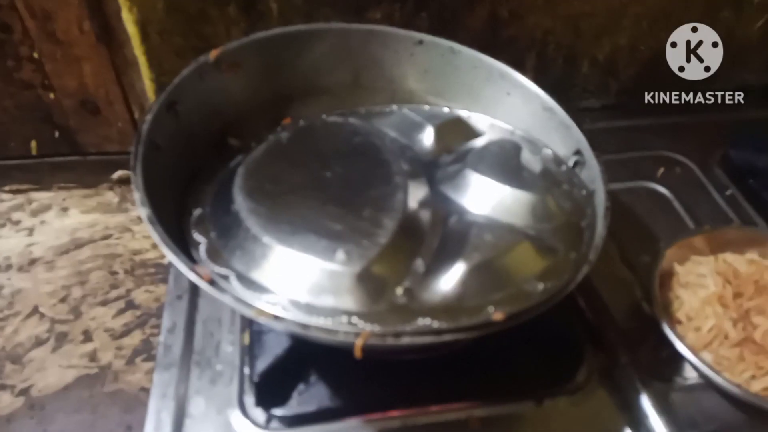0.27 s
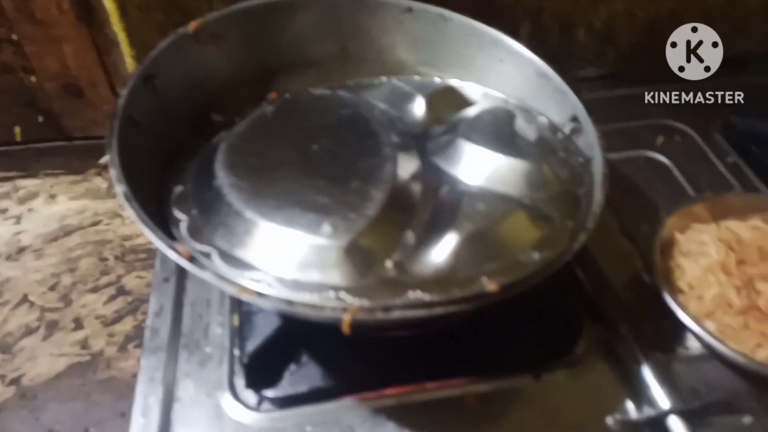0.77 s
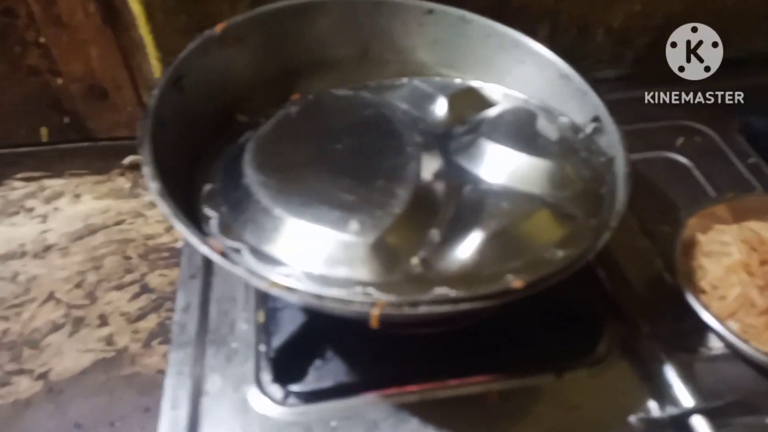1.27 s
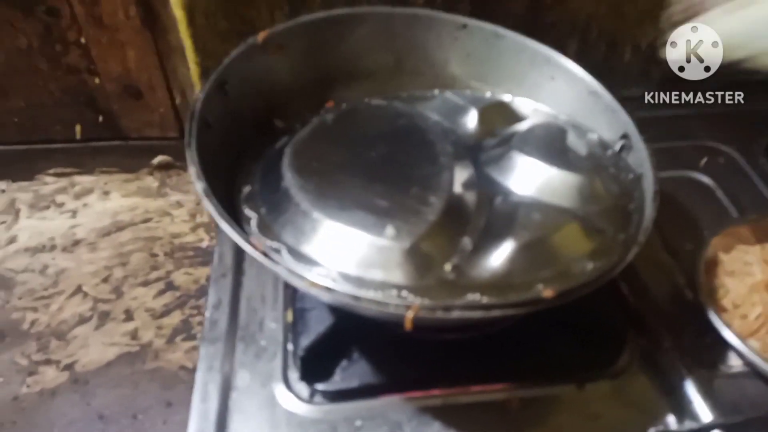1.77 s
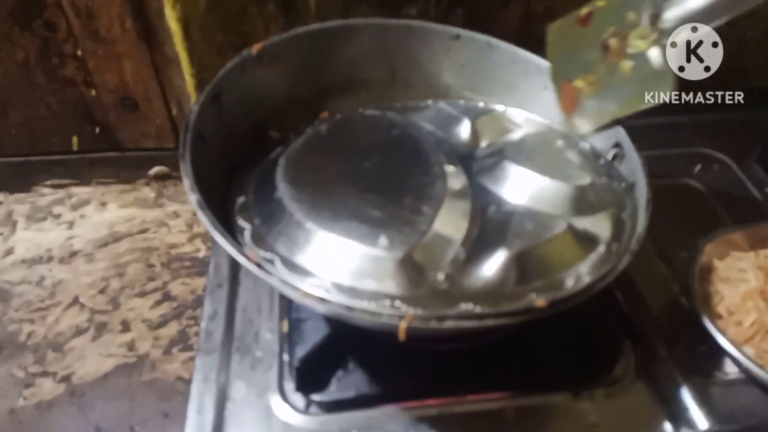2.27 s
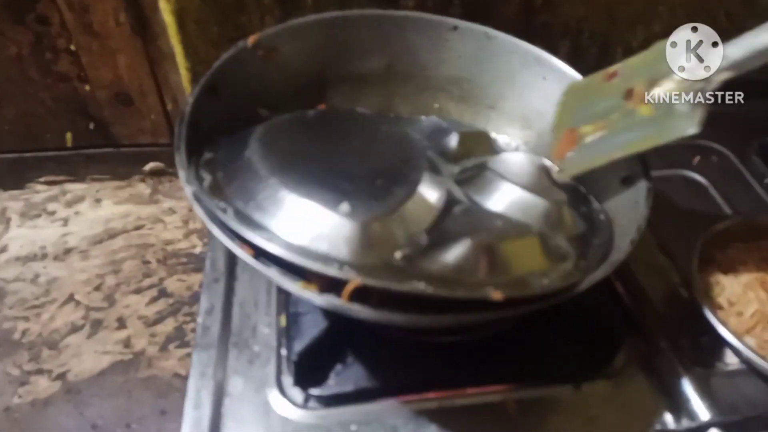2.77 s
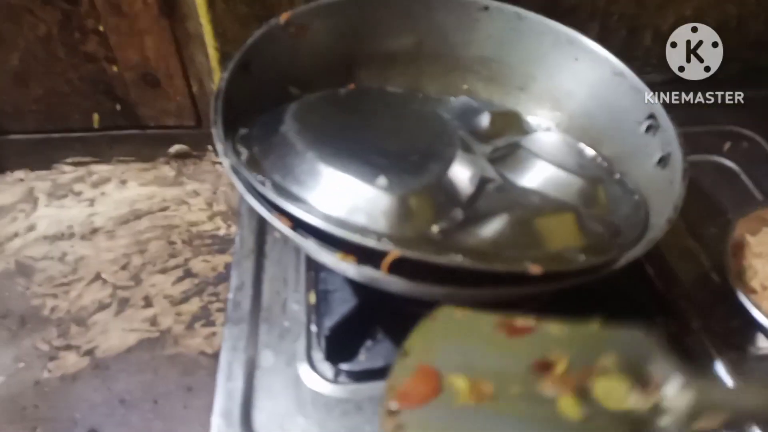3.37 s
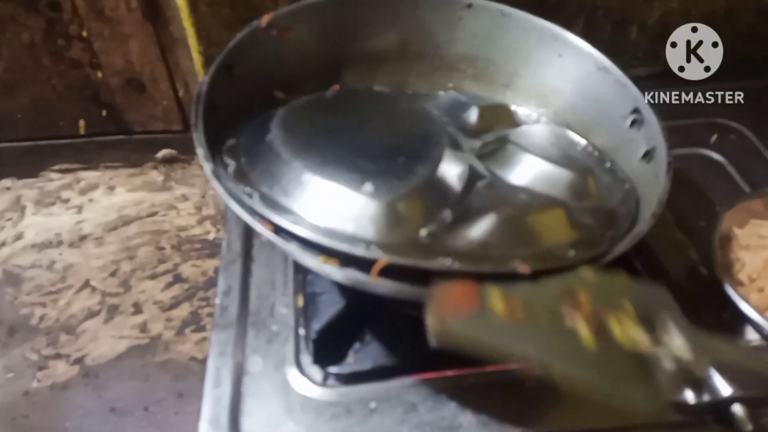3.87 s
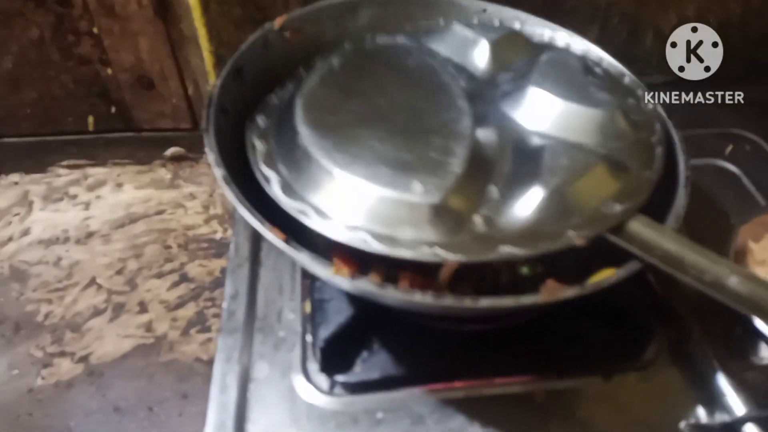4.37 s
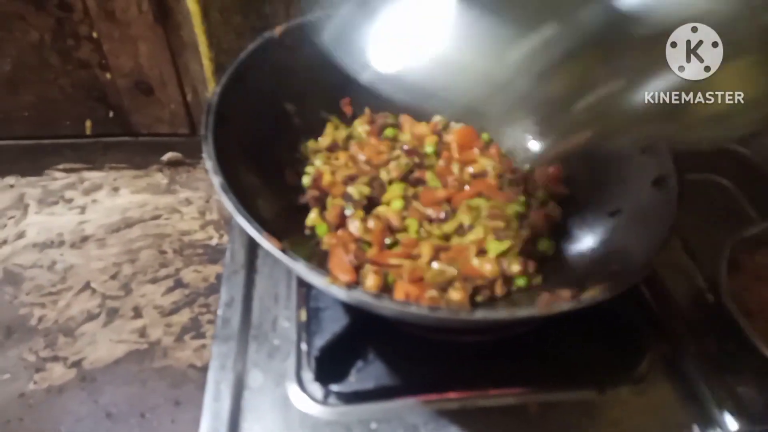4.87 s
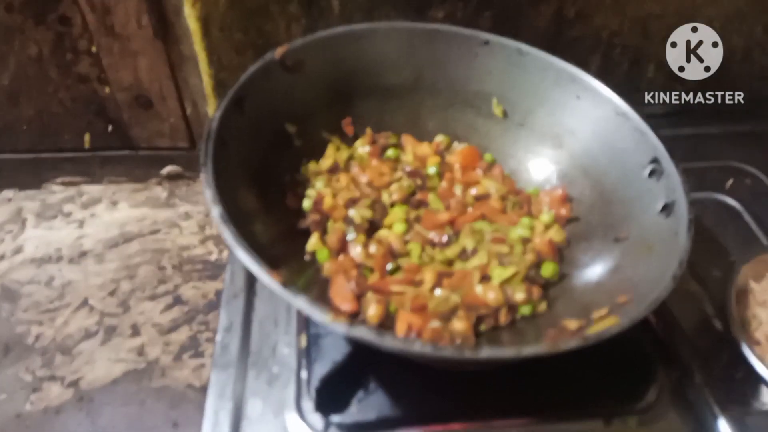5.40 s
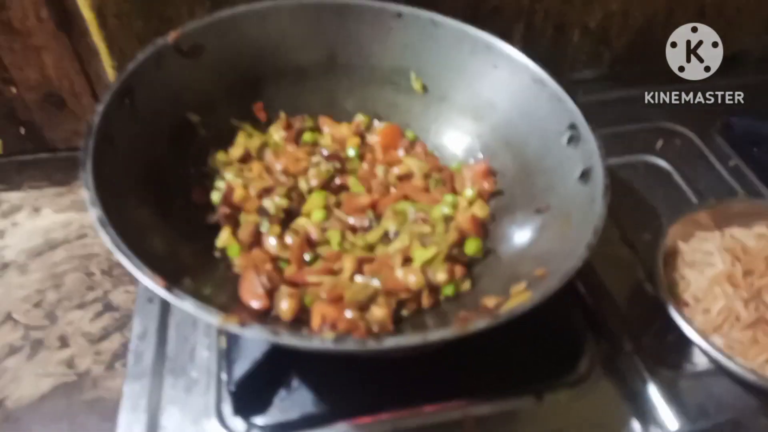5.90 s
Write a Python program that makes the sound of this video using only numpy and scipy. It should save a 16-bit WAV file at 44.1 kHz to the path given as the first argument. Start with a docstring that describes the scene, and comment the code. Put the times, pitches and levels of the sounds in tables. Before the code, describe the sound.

Vegetables sizzle under a steel plate that a spatula scrapes and lifts off; the sizzle opens up and the plate clatters down.

```python
"""Lifting the plate off a sizzling wok

At the stove in a kitchen, a hand-held phone close to the wok. Vegetables fry under an upturned steel
plate, which muffles the bubbles bursting in the oil. A spatula prises the plate ajar, knocks on the
stove, then slides under and lifts it off. The sizzle opens up and the plate clatters down on the counter.
Right at the microphone, fingers rub on the phone case and one draught passes."""
import sys
import numpy as np
from scipy import signal
from scipy.fft import rfft, irfft, next_fast_len
from scipy.io import wavfile
from scipy.ndimage import uniform_filter1d

SR = 44100
rng = np.random.default_rng(int(sys.argv[2]) if len(sys.argv) > 2 else 0)


def digitize_waveform(pressure):
    """Quantize a signal to 16-bit integers and store it at the path in sys.argv[1].

    Rows of a 2-D input are taken as channels; values are limited to [-1, 1].
    """
    field = np.atleast_2d(pressure).T
    bounded = np.clip(field, -1, 1)
    quanta = np.round(bounded * 32767).astype(np.int16)
    wavfile.write(sys.argv[1], SR, quanta)


N = 270838
T = np.arange(N) / SR

# The sizzle as heard at the phone; it fades during the final clatter.
# Each row: time in seconds, level at the phone in dB, how far the plate is off from 0 to 1.
SIZZLE = [(0, 2, 0.1), (1.1, 0.5, 0.08), (2.17, -0.5, 0.07), (2.21, 2, 0.13), (2.8, 1.5, 0.32),
          (3.4, 0.5, 0.5), (4.3, 2, 0.63), (4.8, 4, 0.9), (5.55, 8, 0.85), (6.14, -14, 0.7)]
# Spectra of the oil: bubbles with the plate on and off, a spit, and water flashing to steam.
# Each row: frequency in Hz, level in dB. Levels in all tables are relative.
COVERED_COLOUR = [(25, -24), (80, -4.5), (150, -11.5), (400, -3), (800, -7.5), (1100, -15.5), (1500, 2.5),
                  (2150, -5), (3200, -2), (3800, -10), (5200, -8), (6800, 1.5), (8000, -3.5), (10500, -8.5),
                  (13700, -14)]
UNCOVERED_COLOUR = [(40, -40), (150, -21), (400, -21), (700, -17.5), (1100, -17), (2000, -18), (3500, -11),
                    (5300, -13.5), (6300, -1.5), (7200, -0.5), (7900, -6.5), (9600, -7), (11500, -12),
                    (13700, -15.5)]
SPIT_COLOUR = [(40, -60), (200, -14), (1000, -14), (2800, 14.5), (5000, -4), (7200, 12), (10000, 8),
               (14000, -9)]
FLASH_COLOUR = [(40, -40), (200, -6), (1100, -11), (1500, 6), (4500, 5), (5200, -1), (7200, 7.5),
                (9000, -6), (14000, -14.5)]
# Air and metal under the plate. Each row: frequency in Hz, nominal width in Hz, level in dB.
SHUT_HOLLOW = [(1773, 175, 14.5), (2540, 400, 6)]
AJAR_HOLLOW = [(1933, 40, 7.8), (2405, 420, 13), (2540, 140, 3.3), (3040, 160, 13), (4285, 370, 14),
               (5150, 430, 8.6), (5140, 1700, 2.8)]
# A short click at the very start, then sharp spits of oil.
# Each row: start in seconds, peak in dB, brightness in dB per octave.
CLICK_AND_SPITS = [(0.019, -18, 0), (0.383, -24, -8), (0.876, -16.5, -6.5), (0.897, -18, -5),
                   (0.942, -27, 7), (1.078, -27, 10), (1.187, -25, 8), (1.799, -22.5, 4), (3.155, -24, 8),
                   (4.577, -19, 5), (4.662, -24, -6), (4.914, -21, 10.5), (4.969, -16, 9),
                   (4.975, -23, -10.5), (5.008, -26.5, 6), (5.219, -21, -3.5), (5.269, -17, 14),
                   (5.344, -26, 8)]
# Steam fizzes out under the rim; the blade sticks and slips fast enough to make the plate sing.
# Each row: start in seconds, length in seconds, pitch in Hz, level in dB.
STEAM_SQUEAKS = [(1.108, 0.04, 8970, -39.5), (1.122, 0.06, 14400, -52)]
SCREECHES = [(2.3, .1, 6500, -34), (2.335, 0.064, 7480, -36), (2.618, 0.026, 7480, -36),
             (3.03, 0.12, 4280, -45), (3.22, 0.07, 4300, -44.5), (4.16, .095, 3540, -21.5),
             (4.185, 0.071, 4420, -26), (4.24, 0.085, 6620, -32), (4.47, 0.22, 1590, -46.5)]

# Modes of the plate as a lid on the wok, of the stove top, and of the plate laid on the counter.
# Each row: frequency in Hz, level in dB.
LID_MODES = [(207, -5), (366, -21), (508, 2), (619, 7), (707, 1), (820, -27), (899, 7.5), (1020, -11),
             (1122, -4), (1560, -13), (1873, 10), (2000, -15), (2519, -1), (3103, 13.5), (3208, 14),
             (3386, -4), (3442, 17), (3507, 12.5), (4223, -8), (4462, 5), (4906, 2), (5472, 9.5), (5835, 2),
             (6608, 3), (7400, 18)]
STOVE_MODES = [(204, -1), (293, -4), (465, -2), (608, 0.5), (909, -6), (1195, -8), (1254, -5), (1851, -5),
               (2600, 3.5), (2966, 6), (3380, 9), (4430, -1.5), (6608, -4), (6863, 2)]
LAID_MODES = [(207, -2.5), (266, 5), (366, 6.5), (621, 3), (680, -1), (759, -8), (826, -2), (915, -2),
              (1173, 5), (1246, -9), (2064, 7), (2433, 4.5), (2724, -4.5), (2890, -2), (2974, 0.5),
              (3173, 6.5), (3235, -2), (3345, -11), (3692, -8), (4056, 9), (4357, 10), (4511, 2),
              (5813, -15), (6236, -4), (7200, -16)]
# Spectra of the crowd of weaker modes between those. Each row: frequency in Hz, level in dB.
LID_BED = [(60, -17.5), (130, -7), (250, 3), (700, 4), (1100, -1), (1450, -15), (2300, -8), (3300, -1.5),
           (4300, -3.5), (5100, -9.5), (6000, -1), (7500, -13.5), (9000, -12), (14000, -18.5)]
STOVE_BED = [(60, -11), (200, 3), (600, 6), (1300, 4), (2200, -2), (3100, -2), (5200, -10), (6800, -12),
             (8500, -15), (14000, -29)]
LAID_BED = [(50, -19), (130, 5), (240, 5.5), (450, 3.5), (900, -3.5), (1500, -6.5), (2500, -1.5),
            (4000, 0.5), (5200, -5), (7400, -4), (9000, -12), (14000, -23.5)]
# Blows on the steel. Each row: start in seconds, levels of body, ring, edge and favoured mode in dB,
# that mode's frequency in Hz, decay time of the rattle in seconds, time taken to bite in seconds.
LID_BLOWS = [(2.185, -34, -24, -33, -28, 7180, 0.0088, 0.0012),
             (2.345, -29.5, -34.5, -43, -27.5, 720, 0.012, .004),
             (2.407, -33, -27.5, -32, -26, 7180, 0.003, 0.0016),
             (2.439, -36.5, -36, -30, -42, 6700, 0.037, 0.0012),
             (2.521, -40, -34.5, -38, -31.5, 3510, 0.016, 0.0021),
             (2.604, -31.5, -36, -37, -24.5, 7680, 0.037, 0.015),
             (2.784, -15, -17, -29, -15.5, 624, 0.0053, 0.0013),
             (2.814, -19.5, -20, -29, -15.5, 630.6, 0.0086, 0.0038),
             (3.803, -24.5, -19.5, -29, -25, 1037, 0.016, 0.0045),
             (3.923, -18, -24.5, -30, -29, 354, 0.01, .0005),
             (3.977, -18.5, -18.5, -32, -20, 4140, 0.017, 0.0052),
             (4.042, -22, -25, -45, -25.5, 938, 0.0079, 0.0011),
             (4.1205, -9.5, -12, -47, -11, 732, 0.0068, 0.00047),
             (4.173, -17, -18, -47, -15, 874, 0.025, 0.0074),
             (4.184, -17, -21, -41, -27, 4370, 0.0037, .0006),
             (4.355, -14, -12.5, -28.5, -15.5, 704, 0.019, 0.0031),
             (4.44, -25, -25.5, -50, -28, 3090, .01, .002)]
STOVE_BLOWS = [(3.547, -24.5, -21, -24, -28, 4300, 0.0043, 0.0014)]
LAID_BLOWS = [(5.617, -17.5, -16.5, -38, -11.5, 829, 0.068, 0.0034),
              (5.632, -18, -17.5, -31, -16.5, 918, 0.0089, .0007),
              (5.776, -12, -8, -18.5, -19.5, 231, 0.019, 0.0021),
              (5.826, -41, -22, -24, -23, 2444, 0.012, 0.0024),
              (5.872, -19.5, -17, -29.5, -20, 267, 0.007, 0.0035),
              (5.9069, -11, -7, -21, -21, 1330, 0.078, 0.00053),
              (5.943, -19, -20, -14, -17, 4050, 0.021, 0.0028),
              (6.107, -14, -13, -24, -15.5, 240, 0.016, 0.004),
              (6.122, -15, -19.5, -34, -35, 610, .006, 0.002)]
# Scrapes on the steel. Each row: start in seconds, length in seconds, levels of body, ring, edge and
# favoured mode in dB, that mode's frequency in Hz.
LID_SCRAPES = [(2.186, 0.084, -29, -48, -36.5, -39, 3510), (2.272, 0.14, -31.5, -41, -31, -56, 1050),
               (2.202, 0.21, -64, -62, -60, -36, 200.4), (2.543, 0.14, -48, -55, -34, -45, 3460),
               (2.616, 0.093, -42, -30, -35, -30.5, 259.7), (2.64, .11, -24.5, -25.5, -40, -33, 1130),
               (2.844, 0.027, -35, -35, -35, -27.5, 879), (2.892, 0.074, -56, -34, -34.5, -39, 319),
               (2.925, 0.21, -79, -40.5, -37, -41, 2775), (2.999, 0.27, -62, -43.5, -44, -48, 4270),
               (3.688, 0.046, -40, -50, -58, -28.5, 903), (3.807, 0.04, -26, -47, -55, -45, 2970),
               (3.894, 0.038, -41, -58, -47, -32, 204), (4.018, 0.1, -19.5, -23, -33, -48, 490),
               (4.119, 0.23, -17.5, -21.5, -33, -32, 511), (4.355, 0.16, -22.5, -34.5, -58.5, -30.5, 1620),
               (4.955, 0.069, -69, -37, -56, -39, 1947)]
STOVE_SCRAPES = [(3.551, 0.057, -22, -27.5, -50, -30, 210), (3.6, 0.073, -30.5, -47, -55, -42, 1230)]
LAID_SCRAPES = [(5.358, 0.062, -59, -32, -39, -34.5, 840), (5.39, 0.14, -58, -31, -47, -38, 4220),
                (5.619, 0.049, -22.5, -15.5, -32, -16, 893), (5.654, 0.12, -27.5, -24.5, -30, -25.5, 911),
                (5.662, 0.061, -20.5, -23, -42, -23, 827), (5.789, 0.071, -20.5, -17, -52, -29, 202),
                (5.912, 0.045, -19, -13, -36, -21, 1155), (5.958, 0.14, -26, -20.5, -34, -24.5, 3723),
                (5.991, .11, -29.5, -33, -47, -23, 625)]
# The spatula blade clinks on steel. Each row: start in seconds, level in dB.
BLADE_CLINKS = [(2.184, -14.5), (2.187, -13.5), (2.352, -37), (2.412, -22.5), (2.628, -23.5), (2.784, -26),
                (3.546, -12.5), (3.979, -24)]
# Resonances of sliding steel. Each row: frequency in Hz, nominal width in Hz, level in dB.
BLADE_MODES = [(6030, 140, 0), (6110, 200, -6), (6520, 260, 6.5), (7160, 170, 6), (7770, 150, -2),
               (8200, 180, -1.5), (8930, 150, -11), (9140, 140, -1.5), (9300, 160, -10), (10400, 150, -3.5),
               (10680, 150, -2.5), (11500, 160, -12)]  # the blade's tip skates on the plate
RIM_MODES = [(1840, 140, -11), (2530, 150, 1), (2970, 120, -13), (3520, 300, 2), (3945, 130, -21),
             (4320, 120, -4), (4920, 46, -6.5), (6200, 85, -20), (6500, 56, -8.5)]  # the blade grinds under the plate's rim
GRATE_MODES = [(2350, 120, -5), (3014, 130, 5), (3430, 160, 4), (3660, 96, 3), (3900, 210, -3),
               (4410, 230, -6), (4540, 90, -24), (5900, 150, -4)]  # the plate's edge grates on the counter
LIFTED_MODES = [(1560, 35, -6), (1930, 45, -12), (2460, 90, 2), (3140, 60, 2.5), (4150, 69, -1),
                (4400, 58, -2), (5170, 70, 4)]  # the lifted plate hums faintly
# When each of those four sounds. Each row: start in seconds, hold in seconds, level in dB.
BLADE_STROKES = [(2.225, .04, -35), (2.31, 0.066, -29), (2.53, 0.037, -36), (2.62, 0.073, -40)]
RIM_STROKES = [(3.815, 0.013, -42), (3.99, 0.022, -26), (4.08, .04, -34), (4.174, 0.056, -18.5),
               (4.37, 0.012, -25)]
GRATE_STROKES = [(5.635, 0.094, -21.5), (5.795, 0.08, -19), (5.92, .13, -19.5)]
LIFTED_HUM = [(4.55, 0.59, -46), (5.38, 0.13, -37)]
# Spectrum of the blade's tiniest slips. Each row: frequency in Hz, level in dB.
GRIT_COLOUR = [(1500, -30), (5000, -12), (6500, 0), (7700, 1), (9000, -6), (11500, -9), (14000, -19)]
# Lone ringing modes. Each row: start in seconds, pitch in Hz, level in dB, seconds to fall by 60 dB.
PINGS = [(0.874, 3050, -27, 0.051), (.897, 2950, -35, 0.11), (2.183, 1176, -21, 0.041),
         (2.184, 2530, -31, .17), (2.184, 4460, -25, .06), (2.188, 6680, -29, .13), (2.197, 3490, -24, 0.2),
         (2.241, 4340, -30, 0.098), (2.524, 5460, -28, 0.085), (2.785, 2990, -24, 0.23),
         (2.785, 3380, -15, 0.13), (2.783, 3840, -13, .1), (2.785, 5840, -11, 0.099),
         (2.784, 10400, -26, 0.067), (3.563, 594, -20, 0.26), (3.546, 4430, -20, .07),
         (3.732, 3430, -35, 0.28), (3.809, 3105, -24, 0.41), (3.807, 4240, -21, 0.15),
         (3.812, 2403, -23, 0.17), (3.822, 875, -23, 0.32), (3.98, 3890, -16.5, 0.12),
         (3.979, 7950, -19, 0.052), (4.122, 1945, -16.5, 0.1), (4.186, 3600, -27, 0.23),
         (4.21, 2510, -27, 0.22), (4.443, 3136, -26, 0.35), (4.725, 4200, -37, 0.2),
         (4.739, 5210, -37, 0.17), (4.756, 3620, -39, .18), (5.008, 3100, -31, 0.15),
         (5.14, 4400, -29.5, 0.11), (5.225, 3090, -37, 0.18), (5.365, 5000, -30.5, 0.31),
         (5.482, 2690, -29, 0.27), (5.907, 1172, -12, 0.29), (5.907, 1375, -22, .22),
         (5.906, 2830, -15, .5), (5.912, 4005, -2.5, 0.12)]

# Fingers slip on the phone case, right at the microphone.
# Each row: start in seconds, hold in seconds, levels of hum, scuff, rasp, flutter and judder in dB.
RUBS = [(0.21, 0.028, -50, -50, -49, -61, -45), (0.347, 0.04, -44, -43, -70, -50, -45.5),
        (0.609, 0.064, -36, -39.5, -49.5, -51.5, -41), (0.933, 0.11, -70, -52.5, -49.5, -50.5, -81),
        (1.283, 0.038, -31.5, -65, -31, -77, -30), (1.362, 0.0095, -27.5, -50, -31.5, -74, -21.5),
        (1.407, 0.11, -33, -42, -41, -63.5, -33), (1.542, 0.1, -47, -59, -44, -62, -41.5),
        (1.753, 0.013, -40, -45, -63, -74.5, -41), (1.992, 0.04, -73, -65, -79, -45, -71),
        (4.486, 0.062, -22, -36, -42, -43.5, -26), (4.59, 0.035, -38, -46, -64, -64, -41.5),
        (4.81, 0.19, -44.5, -47, -74.5, -47, -44), (5.373, 0.1, -44, -62, -48, -75.5, -64),
        (5.485, 0.062, -24.5, -27.5, -35, -65, -41), (5.528, 0.046, -20.5, -23.5, -27, -25.5, -48)]
# Resonances of the rubbed case. Each row: frequency in Hz, nominal width in Hz, level in dB.
CASE_MODES = [(303, 9.3, -13), (429.4, 37, 14.5), (488, 70, 8)]
SCUFF_MODES = [(321, 53, 7.5), (407, 56, -18), (562, 30, 1), (700, 51, 5), (894, 74, 1), (1030, 28, -27)]
RASP_MODES = [(855, 58, -16), (1127, 115, 13), (1380, 116, 11), (1807, 360, 10), (2025, 180, 1)]
# Spectra of air fluttering at the microphone port and of a gust across it, then the microphone's own
# response, whose port resonates at the very top. Each row: frequency in Hz, level in dB.
FLUTTER_COLOUR = [(25, -51), (60, -6), (100, -6), (150, 20), (210, -13), (500, -48), (2000, -59)]
DRAUGHT_COLOUR = [(25, -28), (55, -4), (90, 4), (135, -4), (220, -30), (500, -30), (800, -18.5),
                  (1200, -14.5), (3000, -26), (8000, -51)]
MICROPHONE = [(20, -5.5), (13800, -4.5), (14500, 7), (15200, 0), (15600, 22)]


def frying(pops_per_s=5000, hiss=0.56, surge_db=1.5):
    """Close to the microphone, bubbles burst in the oil; the plate muffles them and its hollow rings."""
    level_db, off = curves(SIZZLE)
    pops = grains(pops_per_s, spread_db=2.0) + hiss * rng.standard_normal(N)
    pops *= amp(surge_db * drift(70))
    covered = amp(-42) * unit_rms(colour(pops, COVERED_COLOUR))
    uncovered = amp(-33) * unit_rms(colour(pops, UNCOVERED_COLOUR))
    shut = amp(-48) * resonate(pops, SHUT_HOLLOW)
    # the liveliest bubbles wander over the pan, so each resonance of the open hollow comes and goes
    ajar = amp(-44.5) * shimmer(pops, AJAR_HOLLOW, depth_db=3, per_s=18)
    return amp(level_db) * ((1 - off) * (covered + shut) + off * uncovered + np.sin(np.pi * off) * ajar)


def crackle(per_s=130, snap_s=0.0022, clump_db=3, level_db=-39):
    """Clumps of small snaps stand out of the hiss as the wok opens."""
    _, off = curves(SIZZLE)
    bursts = signal.fftconvolve(abs(grains(per_s, spread_db=4.0)), np.exp(-T[:300] / snap_s))[:N]
    snaps = bursts * amp(clump_db * drift(39)) * rng.standard_normal(N)
    return amp(level_db) * off * unit_rms(colour(snaps, UNCOVERED_COLOUR))


def tinkles(per_s=90, level_db=-50, t60=0.087, spots=24):
    """Droplets land on the bare wok and ring it faintly, clearer the further the plate is off."""
    out, t = np.zeros(N), T[:SR // 6]
    _, off = curves(SIZZLE)
    drops, spot = grains(per_s, spread_db=1.4), rng.integers(0, spots, N)
    spot_hz = np.geomspace(2200, 6200, spots) * rng.uniform(0.75, 1.03, spots)
    for i in np.flatnonzero(drops):
        add(out, i / SR, drops[i] * amp(-60 * t / t60) * np.sin(2 * np.pi * spot_hz[spot[i]] * t))
    return amp(level_db) * off * unit_rms(out)


def spitting(snap_s=0.0021):
    """After an opening click, larger bubbles snap, a drop flashes off, and steam fizzes at the rim."""
    out, t = np.zeros(N), T[:400]
    for start, db, bright_db in CLICK_AND_SPITS:
        tilted = [(hz, level + bright_db * np.log2(hz / 1000)) for hz, level in SPIT_COLOUR]
        snap = colour(rng.standard_normal(len(t)) * np.exp(-t / snap_s), tilted)
        add(out, start, amp(db) * snap / abs(snap).max())
    boiling = unit_rms(colour(grains(5000, spread_db=3.3), FLASH_COLOUR))
    flash = amp(-29.5) * boiling * swell(start=0.896, hold=0.047, rise_db_per_s=1100, fall_db_per_s=191)
    return out + flash + whistles(STEAM_SQUEAKS, width_hz=250)


def struck_steel(modes, bed, t60, bed_t60, bed_db, tick_db, detune=0.0074, vary_db=4, cluster_db=3):
    """A steel object's answer to one contact, split into body, ring and edge: low, middle and high."""
    t = T[:SR // 3]
    hz, db = np.transpose(modes)[:, :, None]
    # each contact point loads the modes differently
    weight, shift, side = rng.standard_normal((3, len(hz), 1))
    life = t60 * (hz / 1000) ** -.15  # high modes die a little sooner
    tones = np.sign(side) * np.sin(2 * np.pi * hz * (1 + detune * shift) * t)
    strong_modes = (amp(db + vary_db * weight - 60 * t / life) * tones).sum(0)
    crowd = unit_rms(rng.standard_normal(len(t)) * amp(-60 * t / bed_t60))
    crowd[32] += amp(tick_db) * np.sqrt(len(t))  # the tick of the contact itself
    grid_hz = np.arange(50, 14000, 110)
    bunching_db = cluster_db * rng.standard_normal(len(grid_hz)) * (grid_hz > 1400)
    weak_modes = colour(crowd, np.c_[grid_hz, level_at(bed, grid_hz) + bunching_db])
    tap = unit_rms(strong_modes) + amp(bed_db) * unit_rms(weak_modes)
    return [signal.sosfilt(signal.butter(4, edges_hz, "band", fs=SR, output="sos"), tap)
            for edges_hz in [(100, 1400), (1400, 5500), (5500, 17000)]]


def favoured_mode(hz, t60_at_1khz=0.15, build_cycles=0.76):
    """The mode that a contact point rings best builds up quickly, and lasts longer if it is low."""
    t = T[:SR // 3]
    build = 1 - np.exp(-(t * hz / build_cycles) ** 2)
    life = t60_at_1khz * (hz / 1000) ** -.45
    return build * amp(-60 * t / life) * np.sin(2 * np.pi * hz * t)


def contact(force, registers, hz, levels_db, onset_samples):
    """A force rings the steel; where and how hard it lands sets each register and the favoured mode."""
    rung = [signal.fftconvolve(force, response) for response in registers + [favoured_mode(hz)]]
    return sum(amp(db) * x / rms(x[:onset_samples]) for x, db in zip(rung, levels_db))


def clatter(steel, blows, scrapes, blow_db, scrape_db, chatter, slips_per_s):
    """Blows are a tap that bites and a short chatter of rebounds; scrapes are swelling runs of slips."""
    out, t = np.zeros(N), T[:SR // 8]
    rebounds, slips = grains(1100, spread_db=3.2), grains(slips_per_s, spread_db=3.17)
    for k, (start, *levels_db, hz, rattle_s, bite_s) in enumerate(blows):
        force = chatter * rebounds[k * len(t):][:len(t)] * np.exp(-t / rattle_s)
        force[0] += 1  # the tap
        blow = contact(force, steel(), hz, levels_db, onset_samples=1300)
        add(out, start, amp(blow_db) * blow * np.minimum(T[:len(blow)] / bite_s, 1))
    for start, length, *levels_db, hz in scrapes:
        run = slips[round(start * SR):][:round(length * SR)]
        force = run * signal.windows.tukey(len(run), .6)
        add(out, start, amp(scrape_db) * contact(force, steel(), hz, levels_db, onset_samples=len(run)))
    return out


def plate_on_wok():
    """The plate knocks and scrapes in the wok as the spatula prises it up."""
    steel = lambda: struck_steel(LID_MODES, LID_BED, t60=0.19, bed_t60=0.23, bed_db=7, tick_db=-11)
    return clatter(steel, LID_BLOWS, LID_SCRAPES, blow_db=-4, scrape_db=-4,
                   chatter=0.061, slips_per_s=600)


def stove_knock():
    """The spatula strikes the stove top and drags on it briefly."""
    steel = lambda: struck_steel(STOVE_MODES, STOVE_BED, t60=0.16, bed_t60=0.57, bed_db=-1, tick_db=-2)
    return clatter(steel, STOVE_BLOWS, STOVE_SCRAPES, blow_db=-2.5, scrape_db=1,
                   chatter=0.11, slips_per_s=700)


def plate_on_counter():
    """The plate clatters down beside the stove, where its modes ring longer."""
    steel = lambda: struck_steel(LAID_MODES, LAID_BED, t60=0.39, bed_t60=0.081, bed_db=9, tick_db=-9,
                                 detune=0.0029)
    return clatter(steel, LAID_BLOWS, LAID_SCRAPES, blow_db=0.5, scrape_db=-0.5,
                   chatter=0.024, slips_per_s=1100)


def blade_clinks(attack_s=0.0025, damped_t60=0.024, free_t60=0.11, free_db=-14, vary_db=2):
    """The blade rings brightly for an instant, is damped by the contact, and shimmers on faintly."""
    out, t = np.zeros(N), T[:SR // 4]
    hz, _, db = np.transpose(BLADE_MODES)[:, :, None]
    fade = np.minimum(t / attack_s, 1) * (amp(-60 * t / damped_t60) + amp(free_db - 60 * t / free_t60))
    for start, level_db in BLADE_CLINKS:
        weight, phase = rng.standard_normal((2, len(hz), 1))
        tones = amp(db + vary_db * weight) * np.sin(2 * np.pi * (hz * t + phase))
        add(out, start, amp(level_db) * fade * unit_rms(tones.sum(0)))
    return out


def blade_grit(slips_per_s=900, level_db=-5):
    """Tiny sharp slips make the blade's skating a dry, bright rasp."""
    rasp = unit_rms(colour(grains(slips_per_s, spread_db=4), GRIT_COLOUR))
    return amp(level_db) * rasp * swells(BLADE_STROKES, rise_db_per_s=500, fall_db_per_s=130)


def grinding(modes, strokes, slips_per_s, spread_db, shimmer_db, rise_db_per_s, fall_db_per_s):
    """Steel slides in a run of slips; as the contact travels, each resonance comes and goes."""
    rasp = shimmer(grains(slips_per_s, spread_db), modes, shimmer_db, per_s=40)
    return rasp * swells(strokes, rise_db_per_s, fall_db_per_s)


def pings():
    """A touch leaves one mode of the plate, wok or stove ringing."""
    out, t = np.zeros(N), T[:SR // 4]
    for start, hz, db, t60 in PINGS:
        add(out, start, amp(db - 60 * t / t60) * np.sin(2 * np.pi * hz * t))
    return out


def whistles(rows, width_hz):
    """Short rough whistles of steam or steel: noise in one narrow resonance, swelling and fading."""
    out = np.zeros(N)
    for start, length, hz, db in rows:
        whistle = resonate(rng.standard_normal(SR // 3), [(hz, width_hz, 0)])[-round(length * SR):]
        add(out, start, amp(db) * unit_rms(whistle * signal.windows.tukey(len(whistle), .5)))
    return out


def handling_noise(judder_hz=446, waver=0.011, sag_hz_per_db=1.5):
    """Skin slips on the phone case, which hums and judders; air flutters at the microphone port."""
    shapes = np.array([swell(start, hold, rise_db_per_s=464, fall_db_per_s=241)
                       for start, hold, *_ in RUBS])
    levels = amp([levels_db for _, _, *levels_db in RUBS])
    gains = np.sqrt(levels.T ** 2 @ shapes ** 2)  # overlapping rubs add in power
    slips = grains(2700, spread_db=0.59) * amp(drift(50))
    hum, rasp = resonate(slips, CASE_MODES), resonate(slips, RASP_MODES)
    scuff = resonate(grains(1400, spread_db=1.4), SCUFF_MODES)
    # the judder sits near the case's main resonance and sags as the grip eases
    eased_db = np.minimum(20 * np.log10(gains[-1].max() / gains[-1]), 25)
    pitch_hz = (judder_hz - sag_hz_per_db * eased_db) * (1 + waver * drift(120))
    judder = unit_rms(np.sin(2 * np.pi * np.cumsum(pitch_hz) / SR))
    flutter = unit_rms(colour(rng.standard_normal(N), FLUTTER_COLOUR))
    return (gains * [hum, scuff, rasp, flutter, judder]).sum(0)


def draught(level_db=-35):
    """One gust buffets the microphone as the spatula swings past."""
    gust = unit_rms(colour(rng.standard_normal(N), DRAUGHT_COLOUR))
    return amp(level_db) * gust * swell(start=3.305, hold=0.042, rise_db_per_s=550, fall_db_per_s=102)


def kitchen(x, t60=0.35, wet_db=-13, gap_s=0.004):
    """The direct sound, then a short tail from the nearby walls."""
    t = T[:SR // 2]
    tail = rng.standard_normal(len(t)) * amp(-60 * t / t60) * (t > gap_s)
    return x + amp(wet_db) * signal.fftconvolve(x, tail / np.linalg.norm(tail))[:N]


def amp(db):
    return 10 ** (np.asarray(db) / 20)


def rms(x):
    return np.sqrt(np.mean(x ** 2) + 1e-20)


def unit_rms(x):
    return x / rms(x)


def add(mix, start, sound):
    part = mix[round(start * SR):][:len(sound)]
    part += sound[:len(part)]


def curves(rows):
    """Each column after the first, joined by straight lines in time."""
    times, *columns = np.transpose(rows)
    return [np.interp(T, times, column) for column in columns]


def level_at(spectrum, hz):
    """A spectrum's level in dB, interpolated over log frequency."""
    points_hz, db = np.transpose(spectrum)
    return np.interp(np.log(hz + 1), np.log(points_hz + 1), db)


def colour(x, spectrum):
    """Filters x by a smooth spectrum."""
    size = next_fast_len(len(x) + 2048)
    gain = amp(level_at(spectrum, np.fft.rfftfreq(size, 1 / SR)))
    return irfft(rfft(x, size) * gain, size)[:len(x)]


def resonate(x, modes):
    """Steep-sided resonances side by side, at unit level."""
    out = 0
    for hz, width, db in modes:
        b, a = signal.iirpeak(hz, hz / (1.17 * width), SR)
        out = out + amp(db) * signal.lfilter(b, a, signal.lfilter(b, a, x))
    return unit_rms(out)


def shimmer(x, modes, depth_db, per_s):
    """Resonances that each wander in strength, together at unit level."""
    return unit_rms(sum(amp(db + depth_db * drift(per_s)) * resonate(x, [(hz, width, 0)])
                        for hz, width, db in modes))


def drift(per_s):
    """A random wander of unit size."""
    knots = np.arange(0, T[-1] + 1, 1 / per_s)
    return unit_rms(np.interp(T, knots, rng.standard_normal(N // 64)[:len(knots)]))


def grains(per_s, spread_db):
    """A random train of tiny clicks, a few larger than the rest."""
    size = amp(spread_db * np.minimum(rng.exponential(1, N), 5))
    return unit_rms(size * rng.choice([-1, 1], N) * (rng.random(N) < per_s / SR))


def swell(start, hold, rise_db_per_s, fall_db_per_s):
    """Rises to full strength at start, holds, and dies away; times are in seconds."""
    early, late = np.maximum(start - T, 0), np.maximum(T - start - hold, 0)
    return amp(-np.minimum(rise_db_per_s * early + fall_db_per_s * late, 100))


def swells(strokes, rise_db_per_s, fall_db_per_s):
    """One swell for each stroke, added in power."""
    return np.sqrt(sum((amp(db) * swell(start, hold, rise_db_per_s, fall_db_per_s)) ** 2
                       for start, hold, db in strokes))


def scene():
    """From beside the stove, in mono: steel ringing in the room, close frying, a hand on the phone."""
    knocks = plate_on_wok() + stove_knock() + plate_on_counter()
    blade = blade_clinks() + blade_grit()
    skate = grinding(BLADE_MODES, BLADE_STROKES, slips_per_s=1400, spread_db=4.0, shimmer_db=2.5,
                     rise_db_per_s=387, fall_db_per_s=132)
    rim = grinding(RIM_MODES, RIM_STROKES, slips_per_s=530, spread_db=4.5, shimmer_db=-2.5,
                   rise_db_per_s=595, fall_db_per_s=135)
    grate = grinding(GRATE_MODES, GRATE_STROKES, slips_per_s=1100, spread_db=2.5, shimmer_db=1.5,
                     rise_db_per_s=900, fall_db_per_s=348)
    lifted = grinding(LIFTED_MODES, LIFTED_HUM, slips_per_s=150, spread_db=6.5, shimmer_db=7.5,
                      rise_db_per_s=300, fall_db_per_s=79)
    steel = knocks + blade + skate + rim + grate + lifted + pings() + whistles(SCREECHES, width_hz=150)
    mix = kitchen(steel) + frying() + crackle() + tinkles() + spitting() + handling_noise() + draught()
    return mix[None]


def record(dry, threshold_db=-21, squeeze=0.38, recovery_db_per_s=60, ceiling=0.62, cutoff_hz=15520):
    """The phone: microphone colour, gain control that ducks on loud clatter, soft clip, band limit."""
    x = colour(dry[0], MICROPHONE)
    power_db = 10 * np.log10(abs(uniform_filter1d(x ** 2, size=400)) + 1e-12)
    recovery_db = T * recovery_db_per_s
    held_db = np.maximum.accumulate(power_db + recovery_db) - recovery_db  # jumps up, sinks steadily
    over_db = np.maximum(held_db - threshold_db, 0)
    ducked = x / amp(squeeze * uniform_filter1d(over_db, size=200))
    clipped = ceiling * np.tanh(ducked / ceiling)
    lowpass = signal.firwin(1023, cutoff_hz, window=("kaiser", 9), fs=SR)
    return signal.oaconvolve(clipped, lowpass, "same")[None]


dry = scene()
out = record(dry)
digitize_waveform(out)
```